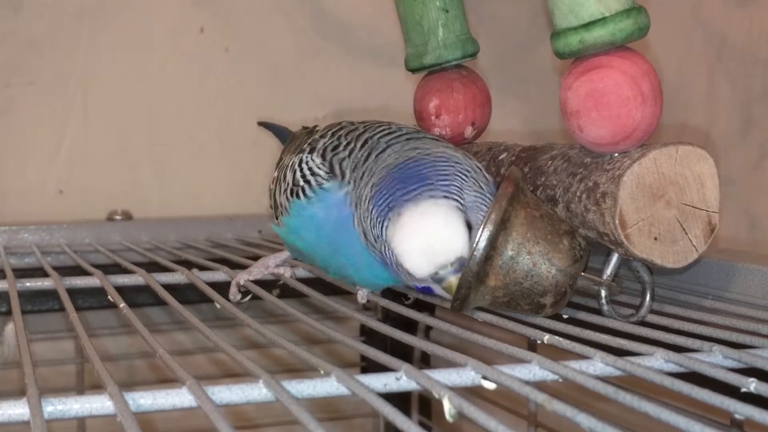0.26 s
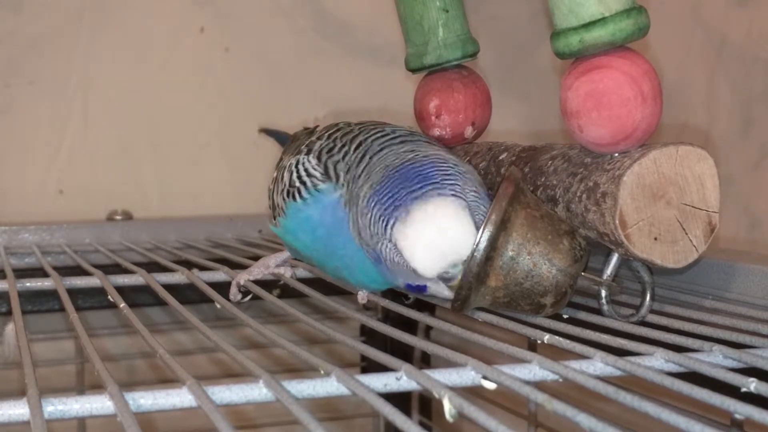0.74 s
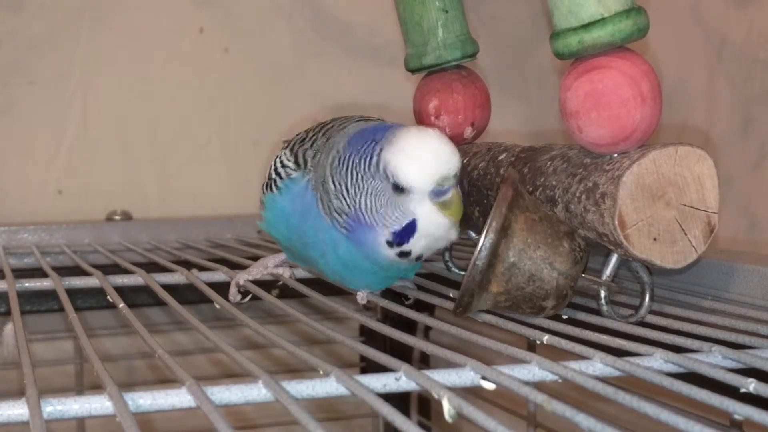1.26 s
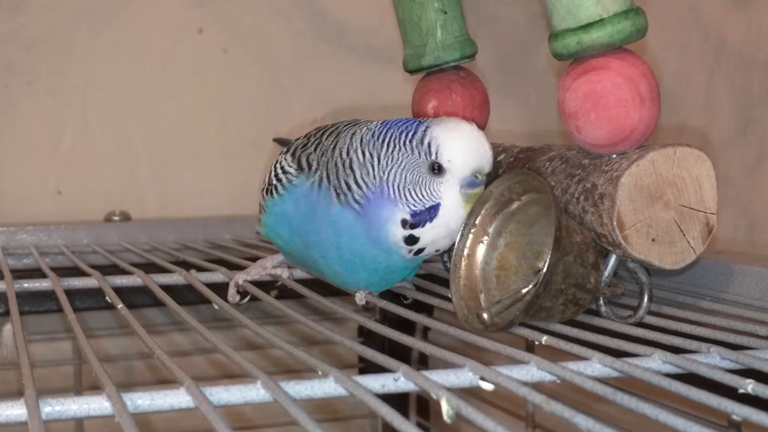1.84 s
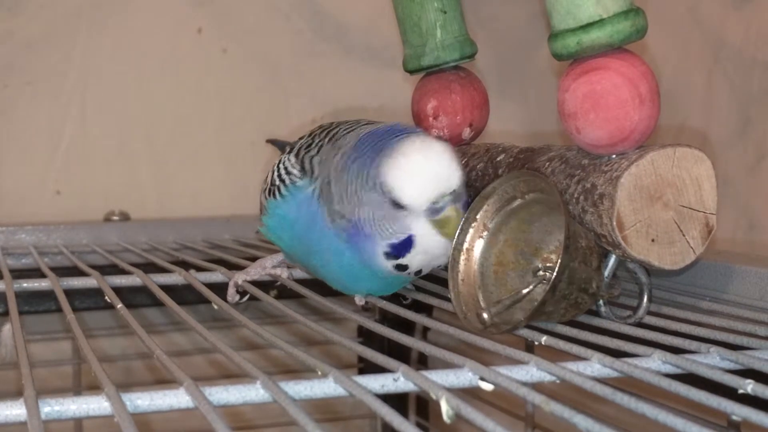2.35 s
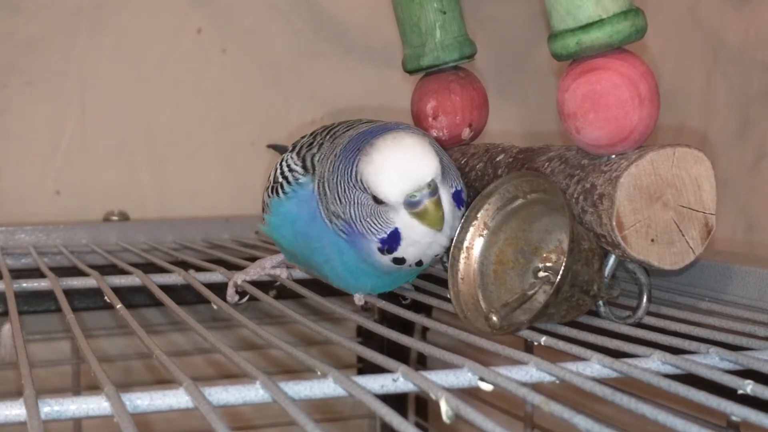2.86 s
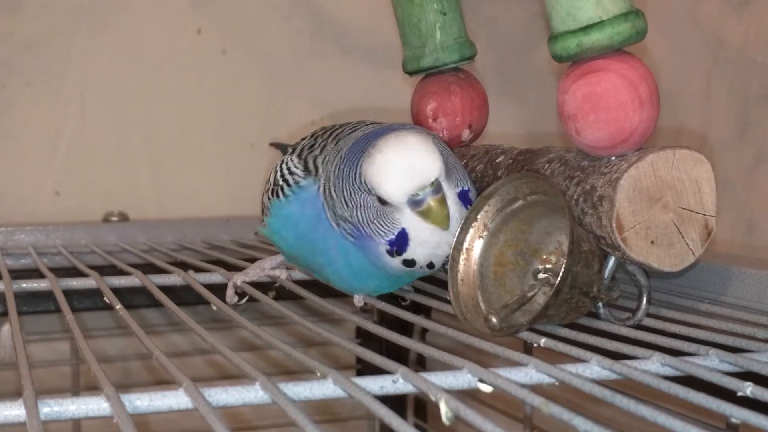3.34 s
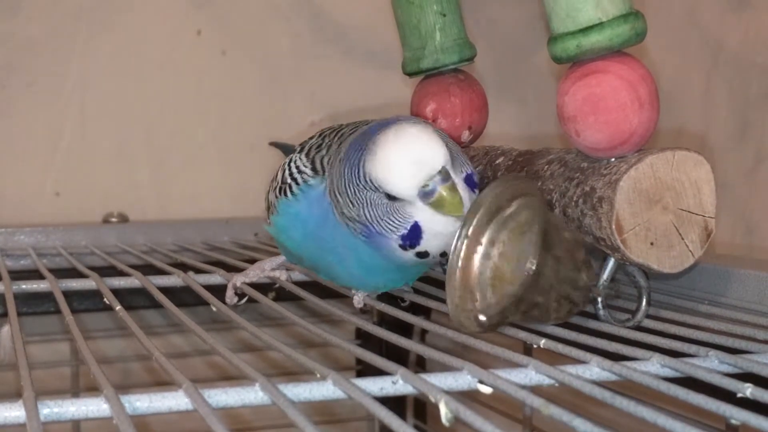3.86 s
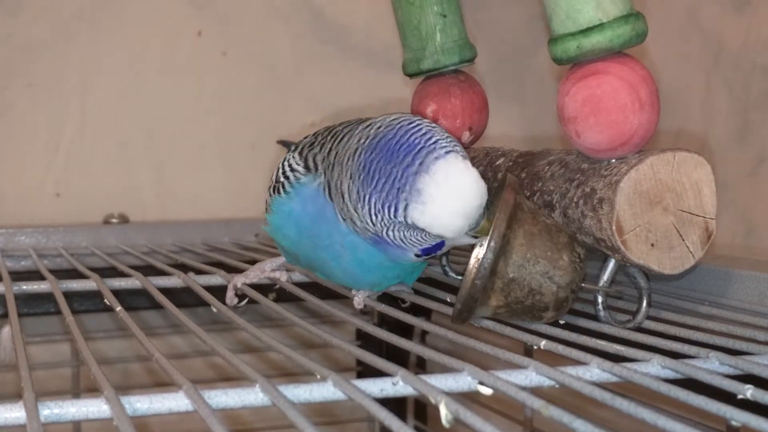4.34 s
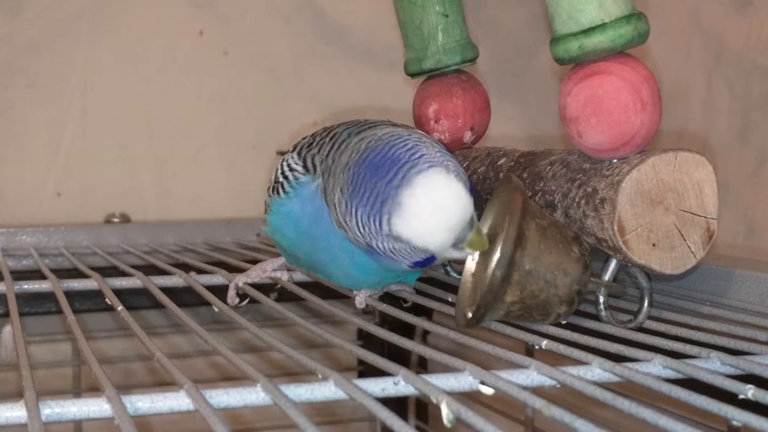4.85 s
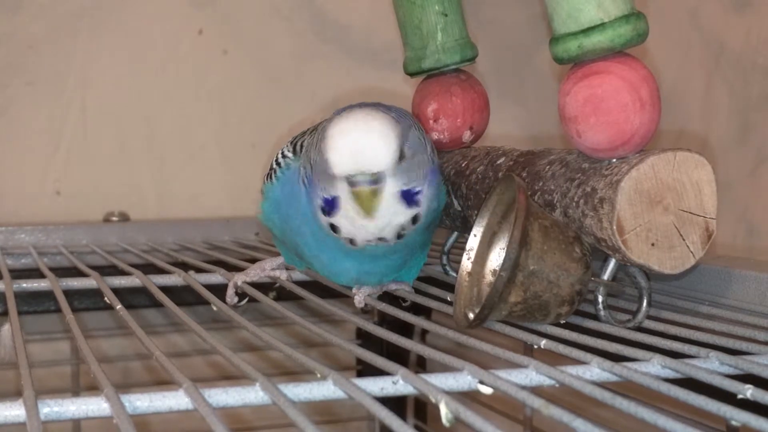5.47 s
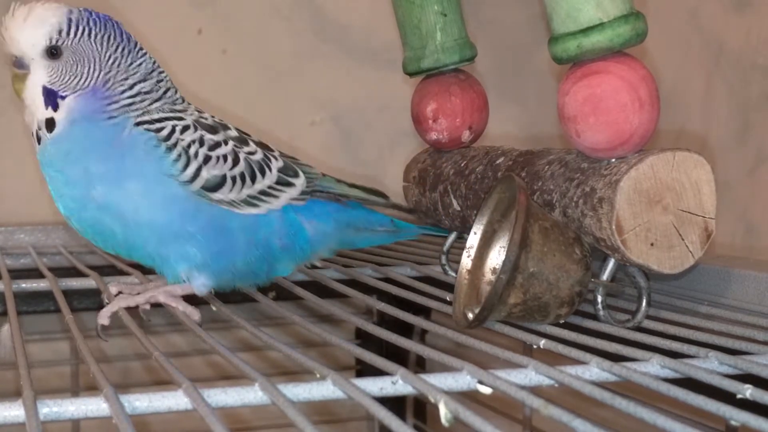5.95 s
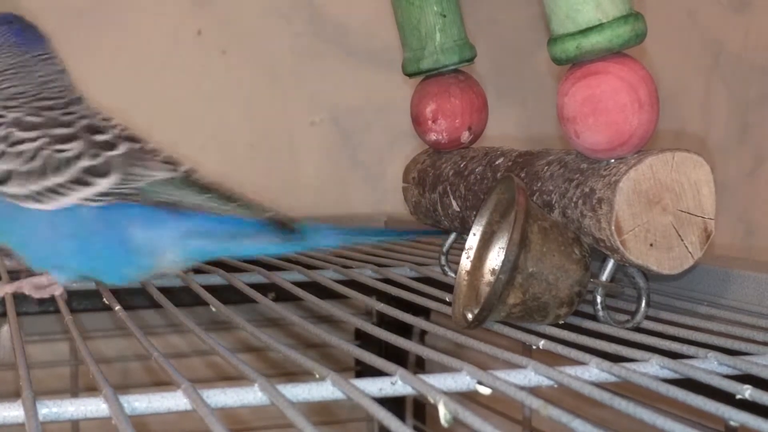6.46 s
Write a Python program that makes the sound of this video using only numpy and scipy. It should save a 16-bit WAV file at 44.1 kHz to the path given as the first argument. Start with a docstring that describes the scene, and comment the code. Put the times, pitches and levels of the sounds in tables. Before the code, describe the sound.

In a quiet room with low rumble, faint hiss and a barely audible hum, a budgie pecks a small metal bell lying on cage wires. Quick bright clicks build to a loud, high clink around 1.2 seconds, then another cluster at 1.6 with scraping and a soft rustle. Sparser taps follow, a dull woody double knock, faint nibbling, and finally claws ticking and ringing thin wires. One close microphone, mono.

```python
"""A quiet room with a bird cage, one microphone: rumble, hiss and a faint hum run throughout as shaped noise and a sine.
From half a second in, a budgie pecks and shoves a small metal bell lying on the wire cage top: chatters of clicks,
dying bell modes, random ticks of scraping and nibbling, and wires rung by three bumps. Soft noise rustles start at 1.6 s.
At 3.3 s comes a dull double knock with a rebound, in short resonances; sparser pecks follow.
From 5.9 s the bird walks off, its claws plucking the wires, which ring in beating clusters of modes."""
import sys
import numpy as np
from scipy import signal
from scipy.fft import rfft, irfft
from scipy.io import wavfile

SR = 44100
rng = np.random.default_rng(int(sys.argv[2]) if len(sys.argv) > 2 else 0)


def log_audio(samples):
    """Write samples as a 16-bit WAV file to the path given in sys.argv[1]."""
    # one column per channel
    frames = np.atleast_2d(samples).T
    # limit to full scale, then quantise
    limited = np.clip(frames, -1, 1)
    pcm = np.round(limited * 32767).astype(np.int16)
    wavfile.write(sys.argv[1], SR, pcm)


N = 295470
T = np.arange(SR) / SR  # one second of time, the longest a single sound lasts
HZ = np.fft.rfftfreq(SR, 1 / SR)


def amp(db):
    """Decibels to gain."""
    return 10 ** (np.asarray(db) / 20)


def unit(x):
    """Scales to rms 1."""
    return x / np.sqrt(np.mean(abs(x) ** 2) + 1e-20)


def read(points, hz):
    """Reads a two-column table on a log-frequency axis."""
    table_hz, value = np.transpose(points)
    return np.interp(np.log(hz + 1), np.log(table_hz + 1), value)


def add(mix, start_s, sound):
    """Mixes a sound in at its start time, cut off at the end of the scene."""
    part = mix[round(start_s * SR):][:len(sound)]
    part += sound[:len(part)]


def colour(x, gain_db):
    """Causal minimum-phase filter with the given gain curve, scaled to unit power gain."""
    cepstrum = irfft(np.log(unit(amp(gain_db))))
    # fold the cepstrum onto positive time
    cepstrum[1:SR // 2] *= 2
    cepstrum[SR // 2 + 1:] = 0
    impulse_response = irfft(np.exp(rfft(cepstrum)))[:SR // 20]
    return signal.fftconvolve(x, impulse_response)[:len(x)]


def room_noise(spectrum, level_db):
    """Steady noise of the room: white noise shaped by a spectrum and set to an rms level."""
    hz = np.fft.rfftfreq(N, 1 / SR)
    shaped = rfft(rng.standard_normal(N)) * amp(read(spectrum, hz))
    return amp(level_db) * unit(irfft(shaped, N))


# colour of the low room noise: (frequency_hz, relative_density_db [dB per Hz])
RUMBLE = [(8.8, -38.5), (15, -3.5), (59, -0.5), (74, -2.5), (119, -14), (147, -10.5), (172, -14),
          (213, -10), (269, -7), (290, -5.5), (309, -12), (339, -12.5), (447, -19.5), (539, -17),
          (600, -25), (780, -54), (1320, -120)]
# colour of the higher room noise: (frequency_hz, relative_density_db [dB per Hz])
HISS = [(350, -40), (600, -5), (679, -1.5), (727, -6.5), (790, -4.5), (834, -8.5), (1400, -8.5), (1660, -5),
        (1900, -7.5), (2400, -8), (2910, -14.5), (4340, -20), (13200, -18), (14500, -18), (16000, -23.5)]
RUMBLE_DB, HISS_DB = -54, -61  # rms levels
# faint steady tone in the room: (pitch_hz, level_db [rms])
HUM = [(285.3, -72.5)]


def background():
    """The empty room: two bands of steady noise and a faint sine hum."""
    time_s = np.arange(N) / SR
    hum = np.zeros(N)
    for pitch_hz, level_db in HUM:
        tone = np.sin(2 * np.pi * (pitch_hz * time_s + rng.random()))
        hum += amp(level_db) * np.sqrt(2) * tone
    return room_noise(RUMBLE, RUMBLE_DB) + room_noise(HISS, HISS_DB) + hum


# how long the room takes to die away by 60 dB: (frequency_hz, t60_s)
ROOM_T60 = [(500, 0.38), (2500, 0.48), (6000, 0.32), (10000, 0.22), (16000, 0.216)]


def room_tail(size=256):
    """Diffuse reflections: noise with each band dying at its own speed."""
    hz, time_s, bands = signal.stft(rng.standard_normal(SR), SR, nperseg=size)
    fade = amp(-60 * time_s / read(ROOM_T60, hz)[:, None])
    return signal.istft(bands * fade, SR, nperseg=size)[1][:SR]


def contact(length_s, spectrum_db, room_db, grain, room_rise_s=0.002, usual_length_s=0.0046):
    """Hard surfaces chatter in a burst of tiny impacts; the room returns their energy as a tail."""
    sizes = np.exp(grain * rng.standard_normal(SR).clip(-2, 2))  # grain: unevenness of the impacts
    impacts = unit(rng.choice([-1., 1.], SR) * sizes)
    burst = impacts * np.exp(-(T / length_s) ** 4 / 2)
    tail = room_tail() * (1 - np.exp(-T / room_rise_s))
    tail *= np.sqrt(length_s / usual_length_s)  # a longer burst feeds the room more energy
    return colour(burst + amp(room_db) * tail, spectrum_db)


def touch(spectrum, body_db, top_db, hz, height_db, width_hz=300, body_hz=6000, top_hz=13000):
    """The place and hardness of a contact tilt its spectrum and lift one damped resonance."""
    body = 1 / (1 + (HZ / body_hz) ** 8)
    top = 1 - 1 / (1 + (HZ / top_hz) ** 24)
    resonance = 1 / (1 + ((HZ - hz) / width_hz) ** 2)
    return read(spectrum, HZ) + body_db * body + top_db * top + height_db * resonance


USUAL_DB = -35  # level of a usual blow
CHATTER_S, SHORTENING_PER_DB = 0.0061, 0.011  # length of a usual blow, share lost per dB of force
HEIGHT_PER_DB = 0.22  # dB of resonance per dB of force
BODY_PER_HARDNESS = -0.573  # dB of body per dB of hardness


def blow(spectrum, level_db, hardness_db, hz, body_db, height_db):
    """A stronger blow is over sooner and lifts its resonance more; a harder one trades body for top."""
    force_db = level_db - USUAL_DB
    length_s = CHATTER_S * np.exp(-SHORTENING_PER_DB * force_db)
    body_db = body_db + BODY_PER_HARDNESS * hardness_db
    height_db = height_db + HEIGHT_PER_DB * force_db
    return length_s, touch(spectrum, body_db, hardness_db, hz, height_db)


def fine_modes(depth_db, spacing_hz=55):
    """Thin metal has countless weak modes: an uneven comb in dB over frequency."""
    knots = np.arange(0, SR, spacing_hz)
    return depth_db * np.interp(HZ, knots, rng.standard_normal(len(knots)))


def ring(modes, direct, swell_s, waver, waver_hz=35):
    """Dying modes that swell as their reflections gather and waver at random in level and phase."""
    out = np.zeros(SR)
    slow_t = np.arange(0, 2, 1 / waver_hz)
    for hz, level_db, t60_s in modes:
        drift = rng.standard_normal((len(slow_t), 2)) @ [1, 1j]  # complex: moves level and phase
        wavering = 1 + waver * np.interp(T, slow_t, drift)
        tone = (wavering * np.exp(2j * np.pi * (hz * T + rng.random()))).real
        out += amp(level_db) * 1000 ** (-T / t60_s) * tone
    return out * (1 - (1 - direct) * np.exp(-T / swell_s))


# beak and clapper on the bell:
# (start_s, level_db, hardness_db, resonance_hz, ring_db [re level], rim_db [strike near the rim])
PECKS = [ (.499, -52.5, -3, 11500, -19, 0), (.521, -49.5, -1, 9220, -21, 0),
         (.579, -47.5, -3, 9400, -18, 2), (.623, -40.5, -1, 9600, -20, 0),
         (0.6664, -23, 1, 9670, -15.5, 6.5), (0.7118, -24, 1, 11440, -6.5, 7),
         (0.847, -42, -8, 9750, -21, 7), (.9082, -34.5, -1, 11620, -18, -1), (.967, -43, -7, 9600, -16, 6),
         (1.044, -49, -6, 9700, -17.5, 0), (1.113, -47, -10.5, 11500, -15, 0),
         (1.1523, -30, -1, 12500, -23, 9), (1.2177, -16, 2, 11480, -2, -3),
         (1.589, -46, -11, 11500, -5, 12), (1.5995, -29, -1.5, 9780, -17, 8), (1.627, -24, 0, 11540, -4, 6),
         (1.65, -30, -1.5, 11500, -6, 24.5), (2.461, -40, 5, 11440, -23, 5.5),
         (2.475, -41.5, -0.5, 9700, -20, 0), (2.7364, -37.5, -2, 11530, -17, 0),
         (2.745, -40, -4, 9780, -20, 0), (3.359, -49, 1, 11320, -17.5, 0), (3.935, -44, -2, 9250, -8, 8),
         (4.460, -50.5, -9, 10100, -16, 0), (4.759, -56, -18, 7460, -6, 5), (4.799, -51, -18, 3200, -16, 1),
         (4.8643, -35.5, 2.5, 8470, -25, -1), (4.996, -31, 9, 9900, -19, 0),
         (5.149, -46.5, 0, 3220, -10, -3.5)]
# modes of the bell: (pitch_hz, level_db [before the rim share], t60_s, rim_share [fraction of rim_db])
BELL = [(1270, -37, 0.45, 0.77), (2150, -38.5, 0.4, .9), (2490, -42, 0.3, 0.35), (3213, -35, .3, 0.8),
        (3770, -37, 0.27, 0.96), (4300, -29.5, 0.18, 0.98), (6700, -25, 0.18, -0.77),
        (7235, -16, 0.31, 0.86), (7700, -30, .2, .7), (8630, -26, .24, .2), (9940, -14.5, 0.33, 0),
        (9890, -26, 0.23, .6), (10400, -13, 0.22, .1), (11600, -12, 0.206, 0.31), (11412, -13, 0.3, 0.82),
        (11417, 0.5, 0.26, 0.2), (11550, -14, 0.18, 0.5), (11460, -13, 0.27, 0.11),
        (11893, -15, 0.2, -0.039), (12560, -16.5, 0.217, 0.038), (12700, -19, .19, 0),
        (13545, -19, 0.28, 0.58), (13700, -21, 0.246, .5), (14900, -17.5, 0.15, 0.02),
        (15226, -25.5, .15, -0.0074), (15530, -24, .16, -0.11)]
# colour of a contact on the bell: (frequency_hz, relative_level_db)
CLICK = [(100, -35), (800, -23), (1400, -20), (2100, -9), (2600, -11.5), (3200, -6.5), (4200, -8),
         (5400, -11), (7800, -2.5), (10500, 2), (12200, -2), (13500, -5), (14500, -7.5), (15600, -3)]
# the bell knocks against the wires it lies on: (start_s, level_db)
BUMPS = [(.7115, -40), (1.2175, -28), (1.628, -36)]
BEAK_BODY_DB, BEAK_HEIGHT_DB = 1, 10.5  # for a usual blow


def bell():
    """Each peck clicks; a free bell rings on, a held one hardly does; bumps shake the wires below."""
    metal_db = fine_modes(depth_db=4.5)
    out = scrapes_and_nibbles(read(CLICK, HZ) + metal_db)
    for start_s, level_db, hardness_db, hz, ring_db, rim_db in PECKS:
        modes = [(mode_hz, mode_db + share * rim_db, t60_s) for mode_hz, mode_db, t60_s, share in BELL]
        length_s, spectrum_db = blow(CLICK, level_db, hardness_db, hz, BEAK_BODY_DB, BEAK_HEIGHT_DB)
        click = contact(length_s, spectrum_db + metal_db, room_db=-5.0, grain=1.0)
        ringing = amp(ring_db) * ring(modes, direct=0.69, swell_s=0.0487, waver=0.23)
        add(out, start_s, amp(level_db) * (click + ringing))
    for start_s, level_db in BUMPS:
        add(out, start_s, amp(level_db) * wire_ring(octave_db=-3.5))
    return out


# spans of light scraping and faint nibbling on the bell: (start_s, end_s, level_db)
SCRAPES = [(.53, .655, -54), (.80, 1.137, -68), (1.654, 1.74, -46.5), (4.332, 4.404, -61.5),
           (4.721, 4.79, -61)]


def scrapes_and_nibbles(spectrum_db, ticks_per_s=110, size_db=4, room_db=-7):
    """Light scraping and faint nibbling on the bell, as irregular random ticks."""
    out = np.zeros(N)
    for start_s, end_s, level_db in SCRAPES:
        duration_s = end_s - start_s
        ticks = (rng.random(SR) < ticks_per_s / SR) * amp(size_db * rng.standard_normal(SR))
        tick_sound = contact(0.0034, spectrum_db, room_db, grain=0.74)
        rattle = signal.fftconvolve(ticks * (T < duration_s), tick_sound)[:SR]
        # unit() sets the power over a whole second: a shorter span gets less energy
        add(out, start_s, amp(level_db) * np.sqrt(duration_s) * unit(rattle))
    return out


# bending modes of the row of wires:
# (pitch_hz, spread_hz [from wire to wire], level_db [before the tilt per octave], t60_s)
WIRES = [(2304, 60, -22.5, 1), (3500, 60, -16.5, 0.98), (4930, 120, -15, 0.62), (6500, 180, -5, 0.4),
         (8220, 310, -3.5, 0.4), (10200, 180, -2.5, 0.33), (12610, 230, -11, 0.29), (15200, 350, -10, .2)]


def wire_ring(octave_db, direct=0.92, swell_s=0.022, count=9):
    """Neighbouring wires are tuned slightly apart, so each mode is a beating cluster.

    A heavy blow favours the low modes: octave_db tilts them, in dB per octave above the lowest."""
    out = np.zeros(SR)
    lowest_hz = WIRES[0][0]
    for hz, spread_hz, level_db, t60_s in WIRES:
        detune, phase = rng.uniform(-1, 1, (2, count, 1))
        wires = np.cos(2 * np.pi * (hz + spread_hz * detune) * T + np.pi * phase)
        cluster = wires.sum(0) / np.sqrt(count)
        tilt_db = octave_db * np.log2(hz / lowest_hz)
        out += amp(level_db + tilt_db) * 1000 ** (-T / t60_s) * cluster
    return out * (1 - (1 - direct) * np.exp(-T / swell_s))


# soft, dull rustles as bird and toy shift: (start_s, end_s, level_db [before the fades], centre_hz)
RUSTLES = [(1.614, 1.804, -58.5, 1258), (2.217, 2.364, -62.5, 940), (4.755, 5.006, -64, 1380),
           (5.88, 6.038, -64, 1440)]


def rustles(octave_db=-20):
    """Short swells of rubbing noise around one broad resonance."""
    out = np.zeros(N)
    for start_s, end_s, level_db, centre_hz in RUSTLES:
        octaves_away = abs(np.log2((HZ + 1) / centre_hz)).clip(0, 4)
        rub = unit(colour(rng.standard_normal(SR), octave_db * octaves_away))
        size = int((end_s - start_s) * SR)
        add(out, start_s, amp(level_db) * rub[:size] * signal.windows.tukey(size, .8))
    return out


# a dull double knock and its rebound: (start_s, level_db, chatter_s)
KNOCKS = [(3.3146, -42.5, 0.00303), (3.328, -40, 0.0081), (3.346, -46, .005)]
# colour of the knock before its resonances: (frequency_hz, relative_level_db)
KNOCK = [(100, -21.5), (400, -8.5), (1000, -13), (2400, -10.5), (3500, -14), (5500, -24.5), (11000, -19),
         (16000, -29.5)]
# resonances of the knocked body: (pitch_hz, width_hz, height_db)
KNOCK_BODY = [(600, 55, 8), (964, 42.6, 11.5), (1057, 39.6, 8), (1208, 48, 11), (1660, 42, 10),
              (1840, 50, 11), (2290, 117, 9), (3100, 57, 6.5), (4540, 140, 10)]


def knocks():
    """Two quick, woody knocks and a rebound, in short-lived resonances."""
    out = np.zeros(N)
    body_db = sum(height_db / (1 + ((HZ - hz) / width_hz) ** 2) for hz, width_hz, height_db in KNOCK_BODY)
    for start_s, level_db, chatter_s in KNOCKS:
        knock = contact(chatter_s, read(KNOCK, HZ) + body_db, room_db=-10.5, grain=.6)
        add(out, start_s, amp(level_db) * knock)
    return out


# claws on the wires: (start_s, level_db, hardness_db, resonance_hz, ring_db [re level])
STEPS = [ (5.878, -51, -2, 8300, -5), (5.898, -46, -1, 10160, -16), (5.9071, -30, 2, 11740, -17.5),
         (5.952, -40.5, 3, 10200, -9.5), (6.384, -59, 4, 10200, -4), (6.432, -37, 4.5, 12200, -19),
         (6.495, -47.5, 3, 8300, -5.5), (6.5517, -34, 3, 11700, -11.5), (6.6164, -36, -5, 10470, -3)]
# colour of a claw contact: (frequency_hz, relative_level_db)
WIRE_CLICK = [(100, -39), (1200, -19.5), (2200, -16.5), (4800, -13.5), (5600, -16), (6500, -7.5),
              (7200, -13), (8300, -6.5), (9200, -7), (10300, 3.5), (11500, -6), (12700, 0.5),
              (13700, -14.5), (15400, -5.5)]
CLAW_BODY_DB, CLAW_HEIGHT_DB = -2.5, 8  # for a usual blow


def footsteps():
    """Claws catch the cage wires, which click and ring in close groups of modes."""
    out = np.zeros(N)
    metal_db = fine_modes(depth_db=4.5)
    for start_s, level_db, hardness_db, hz, ring_db in STEPS:
        length_s, spectrum_db = blow(WIRE_CLICK, level_db, hardness_db, hz, CLAW_BODY_DB, CLAW_HEIGHT_DB)
        click = contact(length_s, spectrum_db + metal_db, room_db=-5.0, grain=0.64)
        ringing = amp(ring_db) * wire_ring(octave_db=-1.0)
        add(out, start_s, amp(level_db) * (click + ringing))
    return out


def scene():
    """The quiet room with bell, rustles, knocks and footsteps, on one channel."""
    return (background() + bell() + rustles() + knocks() + footsteps())[None]


EDGE_HZ = 15800  # upper band edge


def record(dry):
    """The recorder's band limit: a steep lowpass behind the microphone."""
    lowpass = signal.firwin(511, EDGE_HZ, window=("kaiser", 8), fs=SR)
    return signal.oaconvolve(dry, lowpass[None], "same")


dry = scene()
out = record(dry)
log_audio(out)
```